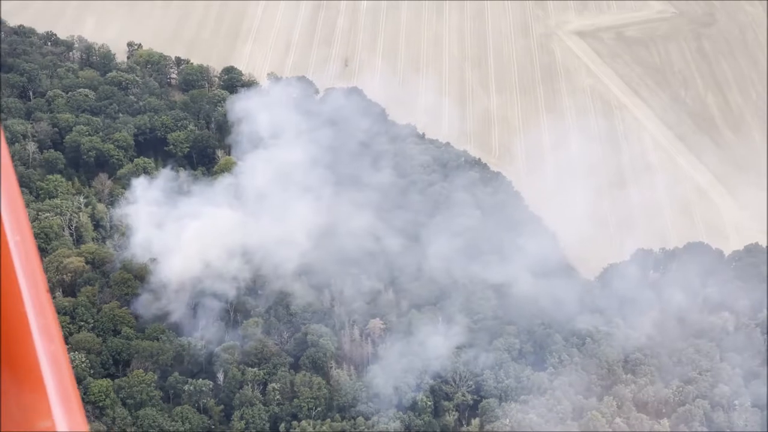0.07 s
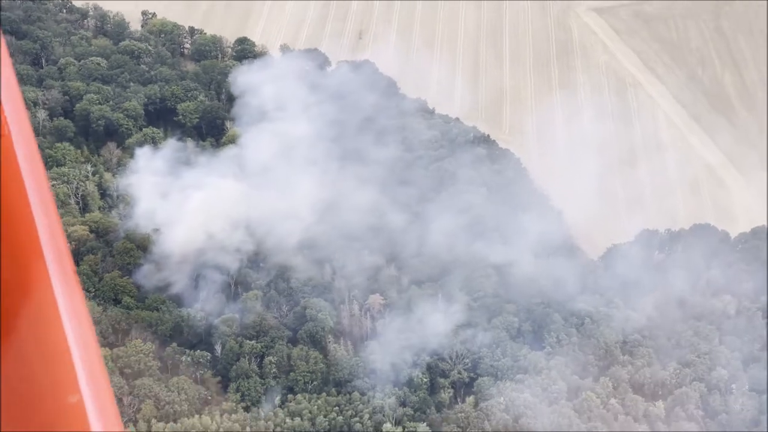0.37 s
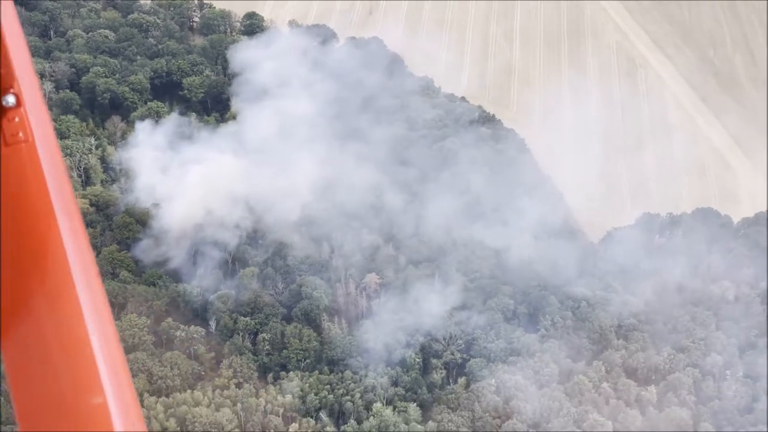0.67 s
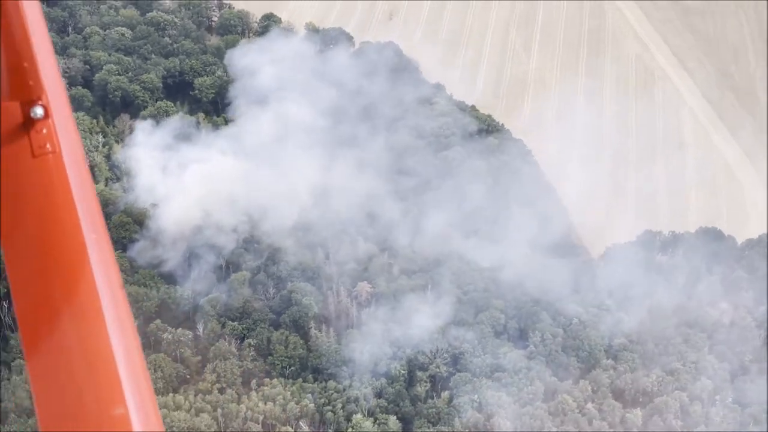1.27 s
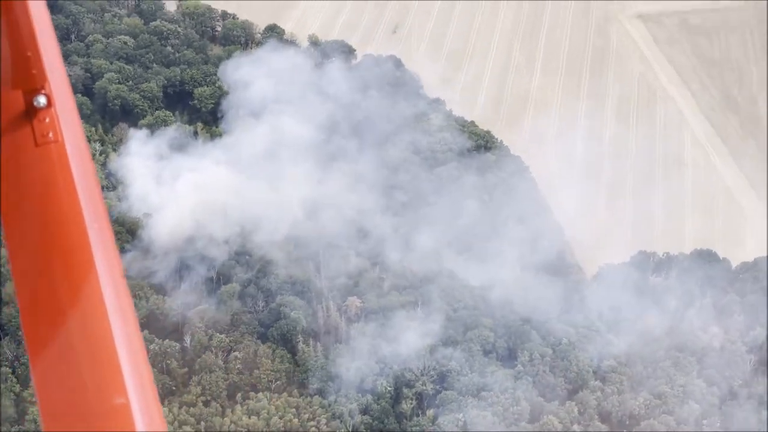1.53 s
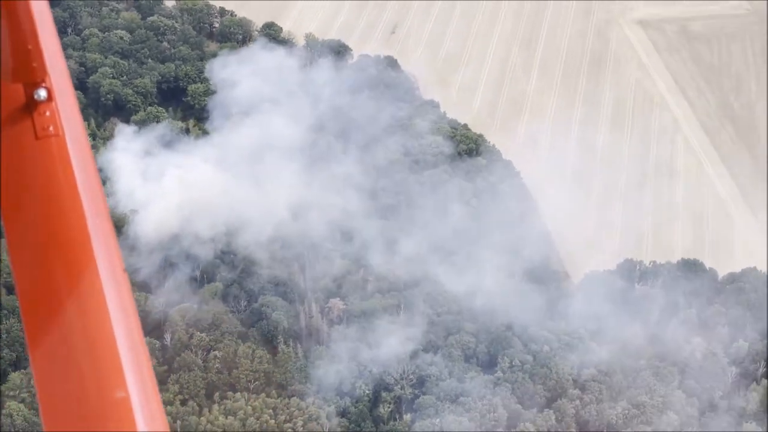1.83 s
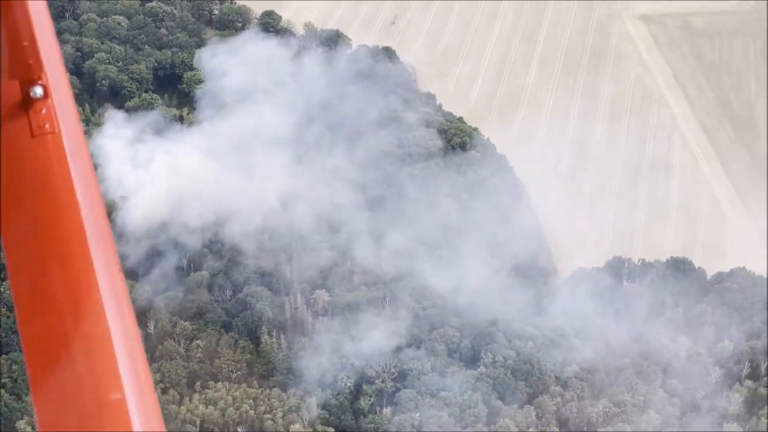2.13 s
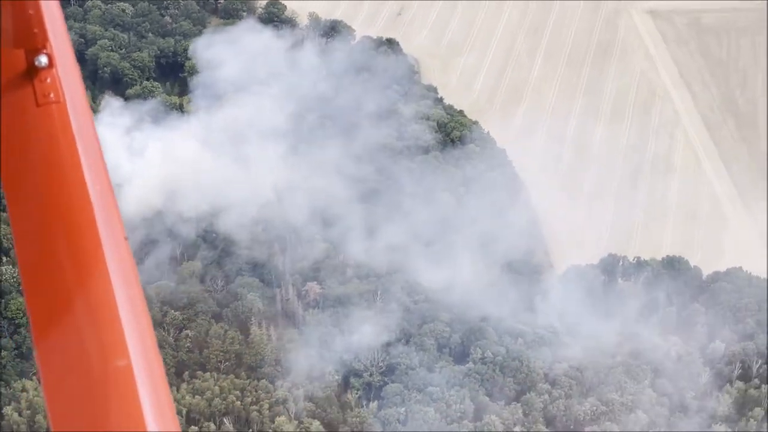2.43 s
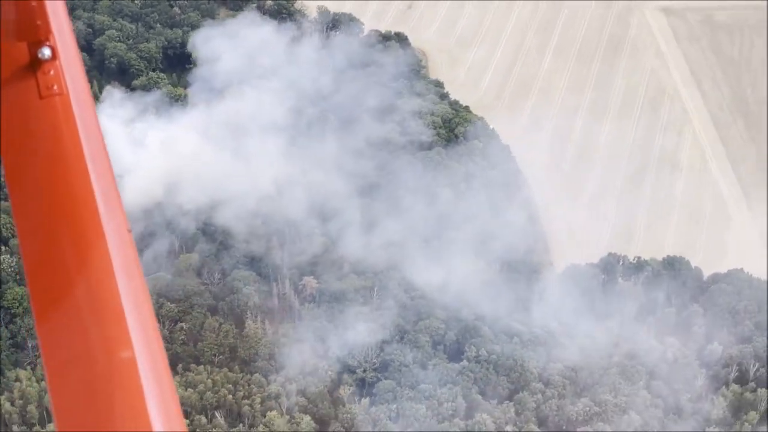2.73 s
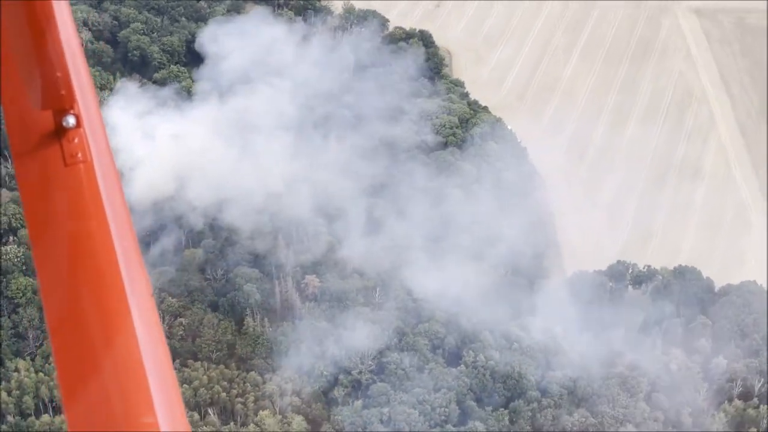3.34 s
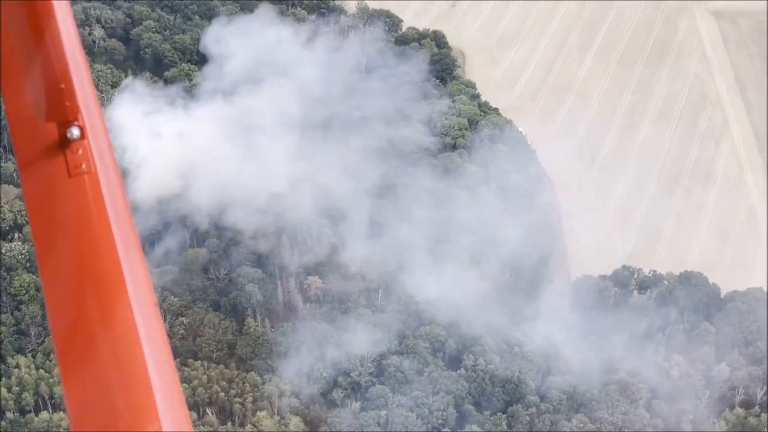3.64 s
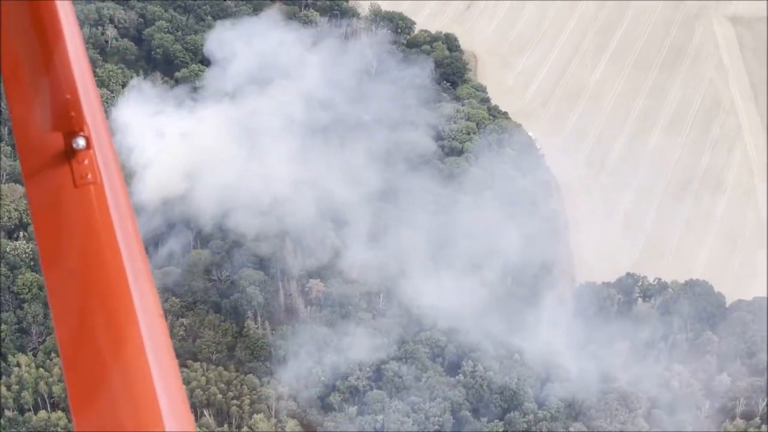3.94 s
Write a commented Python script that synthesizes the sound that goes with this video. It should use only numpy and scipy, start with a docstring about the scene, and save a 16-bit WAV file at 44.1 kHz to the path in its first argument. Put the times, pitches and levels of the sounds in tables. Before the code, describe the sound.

A light aircraft's engine and propeller drone steadily in roaring air, heard inside the cabin.

```python
"""A deep throb and drone in a roar of air: the cabin of a light aircraft in level flight, heard from
inside on two closely spaced microphone ports. A four-cylinder engine turns a two-blade propeller through
a gearbox. The blades throb, the engine's orders drone and ring in the panels, and a hum swells between
them. Gears whine faintly, air whistles through a gap and the slipstream roars around the cabin.
Brief, rough, pitched swells rise out of the roar, and two faint squeaks come near the end."""
import sys
import numpy as np
from scipy import signal
from scipy.fft import irfft
from scipy.io import wavfile
from scipy.ndimage import uniform_filter1d

SR = 44100
rng = np.random.default_rng(int(sys.argv[2]) if len(sys.argv) > 2 else 0)


def store_wav(level_fs):
    """Save 16-bit WAV to argv[1]."""
    pcm = np.round(np.clip(np.atleast_2d(level_fs), -1, 1) * 32767)
    wavfile.write(sys.argv[1], SR, pcm.T.astype(np.int16))


N = 176400
TIME = np.arange(N) / SR


def amp(db):
    """Decibels to gain."""
    return 10 ** (np.asarray(db) / 20)


def unit_rms(x):
    """Scales to rms 1."""
    return x / np.sqrt(np.mean(abs(x) ** 2) + 1e-20)


def curves(points):
    """One control curve, sample by sample, for each column after the time."""
    times, *columns = np.transpose(points)
    return [np.interp(TIME, times, column) for column in columns]


def curve(points):
    """The control curve of a two-column table."""
    return curves(points)[0]


def at_freq(points, hz):
    """A table's value on a log-frequency axis."""
    freqs, values = np.transpose(points)
    return np.interp(np.log(hz + 1), np.log(freqs + 1), values)


def pan(db):
    """Gains at the two ports, the left louder by db."""
    return amp(np.array([[db], [-db]]) / 2)


def swell(peak_s, length_s):
    """A bell-shaped rise and fall, length_s wide at about 60% of its height."""
    return np.exp(-(2 * (TIME - peak_s) / length_s) ** 2 / 2)


def drift(rate_hz):
    """Slow complex random motion of rms about 1."""
    count, span_s = 2048, 8
    hz = np.fft.fftfreq(count, span_s / count)
    motion = np.fft.ifft(np.exp(2j * np.pi * rng.random(count) - (hz / rate_hz) ** 2 / 2))
    return np.interp(TIME, np.arange(count) * span_s / count, unit_rms(motion))


def wandering(hz, wander_hz, rate_hz):
    """Turns of a tone whose pitch strays at random."""
    return np.cumsum(hz + wander_hz * unit_rms(drift(rate_hz).real)) / SR


def wavering(turns, waver, rate_hz, apart):
    """A tone of rms 1 in turbulent air: both ports share `waver`, and each strays alone by `apart`."""
    per_port = np.array([drift(rate_hz), drift(rate_hz)])
    swing = unit_rms(1 + waver * drift(rate_hz) + apart * per_port)
    return np.sqrt(2) * (swing * np.exp(2j * np.pi * (turns + rng.random()))).real


def harmonics(table, turns, waver, rate_hz, apart):
    """Wavering multiples of a rotation, each with its own level and pan."""
    return sum(amp(db) * pan(pan_db) * wavering(round(multiple) * turns, waver, rate_hz, apart)
               for multiple, db, pan_db in table)


# Blade throb inside the cabin, a little to the left: time_s, level_db
BLADE_THROB = [(0, -33), (.6, -28), (1.05, -26.5), (1.5, -30.5), (1.9, -25.5), (2.45, -23.5), (2.85, -24),
               (3.3, -25.5), (3.75, -22), (4, -23)]
# Second and fourth blade harmonics: time_s, second_db, fourth_db
BLADE_OVERTONES = [(0, -24.5, -42.5), (.2, -23.5, -31.5), (.55, -33, -32.5), (.85, -32, -39.5),
                   (1.1, -40, -37), (1.4, -35, -45), (1.85, -60, -40.5), (2.1, -41, -31.5),
                   (2.35, -41, -39.5), (2.6, -43, -34.5), (2.85, -54, -36.5), (3.05, -56, -33),
                   (3.35, -31, -37.5), (3.65, -38, -31), (4, -29, -40)]
# Other blade harmonics: blade_multiple, level_db, left_over_right_db
BLADE_HARMONICS = [(3, -43, -19), (5, -41, 4), (6, -43.5, 4)]

def propeller(blade):
    """Each passing blade pushes the air: a clean deep throb with ragged overtones."""
    throb = amp(curve(BLADE_THROB)) * pan(4) * np.sqrt(2) * np.cos(2 * np.pi * blade)
    second_db, fourth_db = curves(BLADE_OVERTONES)
    second = amp(second_db) * pan(-3) * wavering(2 * blade, waver=0.37, rate_hz=5.6, apart=0.68)
    fourth = amp(fourth_db) * pan(17) * wavering(4 * blade, waver=0.65, rate_hz=5.5, apart=0.45)
    ragged = harmonics(BLADE_HARMONICS, blade, waver=1.0, rate_hz=11, apart=1.0)
    return throb + second + fourth + ragged


# Firing tone, centred between the ports: time_s, level_db
FIRING_LEVEL = [(0, -27.5), (.8, -34.5), (1.15, -25), (1.55, -31.5), (1.9, -29.5), (2.4, -29), (3.1, -36),
                (3.4, -29), (4, -31)]
# Low engine orders in the cabin: cycle_multiple, level_db, left_over_right_db
LOW_ORDERS = [(1, -39.5, 7), (2, -44.5, -8), (6, -43, -6.5)]

def engine(cycle):
    """Four cylinders fire once each per cycle, over the steady drone of the low orders."""
    firing = amp(curve(FIRING_LEVEL)) * wavering(4 * cycle, waver=0.075, rate_hz=1.3, apart=0.12)
    drone = harmonics(LOW_ORDERS, cycle, waver=0.19, rate_hz=1.0, apart=0.11)
    return firing + drone


# Panels ringing around the microphone: cycle_multiple, level_db, left_over_right_db
PANEL_ORDERS = [(14, -58, 9), (18, -53, -6), (21, -52, 21.5), (22, -52, -15.5), (23, -70, 7), (27, -66, 20),
                (29, -59, 20), (30, -56.5, -15), (38, -73, -6), (49, -60, -8), (52, -73, 0), (54, -64, 1)]
# Orders that come and go: cycle_multiple, peak_s, length_s, level_db
SWELLING_ORDERS = [(32, 3.91, 0.81, -49), (39, 3.4, 1.4, -50.5)]

def cabin_panels(cycle):
    """The engine's higher orders ring loosely in the panels; two more swell up late."""
    ringing = harmonics(PANEL_ORDERS, cycle, waver=0.87, rate_hz=3.6, apart=0.71)
    for multiple, peak_s, length_s, db in SWELLING_ORDERS:
        tone = wavering(round(multiple) * cycle, waver=0.33, rate_hz=4, apart=0.36)
        ringing += amp(db) * swell(peak_s, length_s) * tone
    return ringing


# Cabin hum, almost centred: time_s, level_db
HUM_LEVEL = [(0, -35), (.8, -31), (1.4, -36), (2.1, -33), (2.55, -30.5), (2.82, -20.5), (3.15, -28.5),
             (3.5, -22), (3.7, -22.5), (4, -37)]

def hum(turns):
    """Engine vibration mixes with the blade rate: a swelling hum that beats against the firing tone."""
    port_phase_rad = np.array([[-1.33], [0]])  # the left port lags
    phase = 2 * np.pi * (turns + rng.random()) + port_phase_rad
    note = amp(curve(HUM_LEVEL)) * np.sqrt(2) * np.cos(phase)
    octave = amp(-48) * wavering(2 * turns, waver=0.63, rate_hz=1.8, apart=0.49)
    return pan(-1) * (note + octave)


# Gearbox, faint from inside the cabin: time_s, pitch_hz, level_db, octave_db
GEARBOX_TONE = [(0, 1712, -56, -70), (.4, 1707, -57, -69), (1, 1693, -66, -68), (1.4, 1692, -61, -64),
                (1.9, 1691, -53, -61), (2.45, 1689, -56, -61), (2.8, 1692, -66, -68), (3.2, 1692, -59, -61),
                (3.5, 1690, -53, -63), (4, 1688, -61, -63)]

def gear_whine():
    """Meshing gears give a slightly unsteady whine and its octave."""
    pitch_hz, level_db, octave_db = curves(GEARBOX_TONE)
    turns = wandering(pitch_hz, wander_hz=5, rate_hz=12)
    note = amp(level_db) * wavering(turns, waver=0.29, rate_hz=11, apart=0.3)
    octave = amp(octave_db) * wavering(2 * turns, waver=1.1, rate_hz=12, apart=0.5)
    return note + octave


# Thin whistle in the cabin: time_s, pitch_hz, level_db
GAP_TONE = [(0, 1394, -46.5), (.65, 1404, -48), (1.2, 1376, -49), (1.8, 1360, -65), (2.3, 1374, -50),
            (4, 1378, -53)]

def gap_whistle():
    """Air whistles through a gap in a fluttering tone."""
    pitch_hz, level_db = curves(GAP_TONE)
    return amp(level_db) * wavering(np.cumsum(pitch_hz) / SR, waver=0.9, rate_hz=13, apart=0.93)


def cabin_resonances(hz, depth_db=0.9, width_hz=36, from_hz=900):
    """Crowded resonances colour the roar: small random peaks and dips in the middle and treble."""
    bins = max(2, int(width_hz / hz[1]))
    ripple = unit_rms(uniform_filter1d(rng.standard_normal(len(hz)), size=bins))
    return amp(depth_db * ripple * hz / (hz + from_hz))


def turbulence(air, patch_db=1.1, flicker_db=0.24):
    """The roar rises and falls in patches of time and frequency, and flickers slightly as a whole."""
    frames = signal.stft(air, nperseg=512, noverlap=384)[2]
    across_bands = uniform_filter1d(rng.standard_normal(frames.shape[1:]), size=9, axis=0)
    patches = unit_rms(uniform_filter1d(across_bands, size=20, axis=1))
    flicker = unit_rms(uniform_filter1d(rng.standard_normal(frames.shape[2]), size=14))
    gain = amp(patch_db * patches + flicker_db * flicker)
    return signal.istft(frames * gain, nperseg=512, noverlap=384)[1][:, :N]


# Slipstream spectrum from inside the cabin: freq_hz, relative_density_db
ROAR_SPECTRUM = [(10, -33), (30, -23), (45, -10.5), (65, -4), (100, -1), (125, -3), (150, -4.5), (175, -3),
                 (225, -7.5), (255, -6), (300, -7), (355, -11.5), (400, -8), (480, -12), (560, -12),
                 (640, -15), (700, -15), (780, -18), (900, -18), (1000, -21), (1130, -24.5), (1260, -26.5),
                 (1400, -25), (1650, -28.5), (1950, -31), (2350, -31.5), (2550, -35), (2750, -35),
                 (2900, -37.5), (3100, -36.5), (3800, -39), (4400, -41.5), (5200, -41), (7500, -42.5),
                 (9700, -41), (11500, -43.5), (12800, -48.5), (15500, -51)]
# How alike the roar is in left and right; the highest treble is mono: freq_hz, coherence
ROAR_COHERENCE = [(40, .93), (90, .85), (140, .5), (195, .85), (280, .45), (400, .65), (550, .42),
                  (750, .25), (1150, .35), (1600, .8), (2100, .9), (3000, .77), (5200, .73), (5800, .5),
                  (7400, .55), (8100, .8), (8350, .99), (8900, .99), (9600, .75), (11400, .6), (12300, .75),
                  (12900, .99)]
# Balance of the roar between the ports: freq_hz, left_over_right_db
PORT_BALANCE = [(40, 10), (130, 2), (250, -1.5), (380, -1), (520, 5), (750, 0), (1050, 2.5), (1400, 0.5),
                (15000, -0.5)]
# Phase of the roar between the ports: freq_hz, left_lead_rad
PORT_PHASE = [(20, 0), (450, .1), (720, 1.2), (1100, .3), (2000, 0), (3200, -.55), (5200, -.45),
              (5850, 1.5), (6700, .7), (7300, 1.4), (7700, 2.4), (8600, 3.14), (9700, 3.8), (11500, 4.8),
              (12000, 5.6), (12700, 6.28)]
# Slight changes in the airflow: time_s, gain_db
AIRFLOW_GAIN = [(0, 0.5), (.7, 0.4), (1.6, 0.3), (2.3, 0), (3.3, 0.2), (4, 0.06)]

def slipstream(crank, level_db=-22.5, pulse_depth=0.032, pulse_from_hz=630):
    """Turbulent air roars around the cabin; its upper part pulses lightly once per crankshaft turn."""
    hz = np.fft.rfftfreq(N, 1 / SR)
    noise = np.exp(2j * np.pi * rng.random((2, len(hz))))
    coherence = np.clip(at_freq(ROAR_COHERENCE, hz), 0, 1)
    mid, side = np.sqrt(1 + coherence) * noise[0], np.sqrt(1 - coherence) * noise[1]
    to_left = amp(at_freq(PORT_BALANCE, hz) / 2) * np.exp(0.5j * at_freq(PORT_PHASE, hz))
    ports = np.array([(mid + side) * to_left, (mid - side) / to_left])
    spectrum = ports * amp(at_freq(ROAR_SPECTRUM, hz)) * cabin_resonances(hz)
    upper = irfft(spectrum * hz ** 2 / (hz ** 2 + pulse_from_hz ** 2), N)
    air = irfft(spectrum, N) + pulse_depth * np.cos(2 * np.pi * crank) * upper
    return amp(level_db + curve(AIRFLOW_GAIN)) * unit_rms(turbulence(air))


# Swells in the roar around the microphone: peak_s, length_s, pitch_hz, level_db
ROAR_SWELLS = [(.32, 0.52, 399.2, -34.5), (1.262, 0.052, 379.3, -27), (2.93, .13, 290, -28.5),
               (3.33, 0.044, 714, -36), (3.741, 0.057, 520, -27.5)]

def roar_swells():
    """Brief, rough, pitched swells in the roar."""
    out = np.zeros((2, N))
    for peak_s, length_s, pitch_hz, db in ROAR_SWELLS:
        turns = wandering(pitch_hz, wander_hz=20, rate_hz=40)
        out += amp(db) * swell(peak_s, length_s) * wavering(turns, waver=0.52, rate_hz=39, apart=0.59)
    return out


# Squeaks somewhere in the cabin: peak_s, length_s, pitch_hz, level_db
CABIN_SQUEAKS = [(3.1, .04, 2552, -49.5), (3.305, .075, 2455, -47)]

def squeaks(rise_hz_per_s=1100):
    """Two faint, unsteady squeaks, each rising in pitch."""
    out = np.zeros((2, N))
    for peak_s, length_s, pitch_hz, db in CABIN_SQUEAKS:
        turns = wandering(pitch_hz + rise_hz_per_s * (TIME - peak_s), wander_hz=18, rate_hz=40.6)
        out += amp(db) * swell(peak_s, length_s) * wavering(turns, waver=0.5, rate_hz=29, apart=0.27)
    return out


# Crankshaft speed in level flight: time_s, turns_per_s
CRANK_SPEED = [(0, 81.0), (.5, 81.3), (1.2, 80.92), (1.8, 80.78), (2.5, 80.83), (3.2, 80.76), (4, 80.56)]
GEAR_RATIO, BLADES = 17 / 7, 2

def scene():
    """In the cabin: propeller, engine, panels and hum follow the crankshaft; air roars around them."""
    crank = np.cumsum(curve(CRANK_SPEED)) / SR  # turns so far
    blade = crank * BLADES / GEAR_RATIO  # blade passes so far
    cycle = crank / 2  # a four-stroke cycle takes two turns
    machinery = propeller(blade) + engine(cycle) + cabin_panels(cycle) + hum(crank + blade)
    return machinery + gear_whine() + gap_whistle() + slipstream(crank) + roar_swells() + squeaks()


def record(dry):
    """The recorder cuts off the highest treble from both microphone ports."""
    cutoff_hz = 15650
    lowpass = signal.firwin(511, cutoff_hz, window=("kaiser", 9), fs=SR)
    return signal.oaconvolve(dry, lowpass[None], "same")


dry = scene()
out = record(dry)
store_wav(out)
```